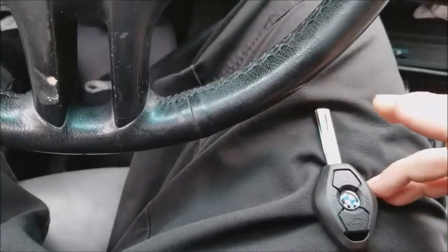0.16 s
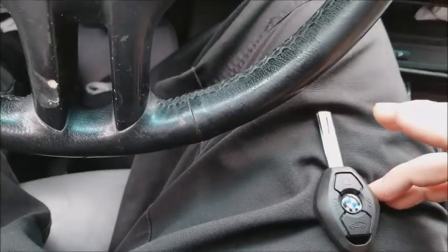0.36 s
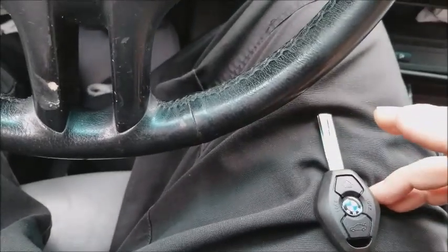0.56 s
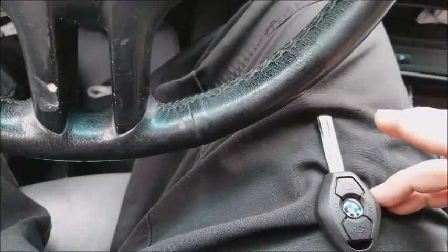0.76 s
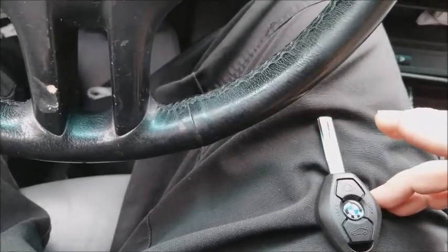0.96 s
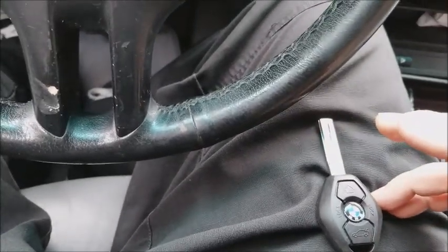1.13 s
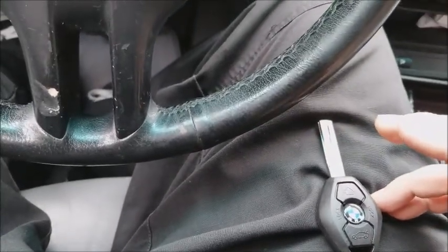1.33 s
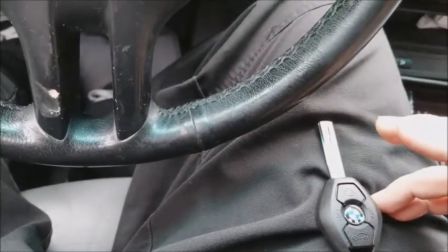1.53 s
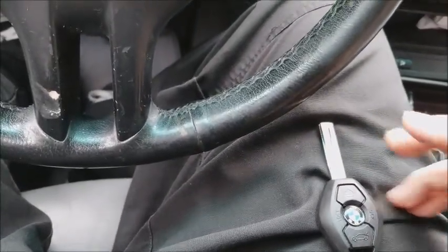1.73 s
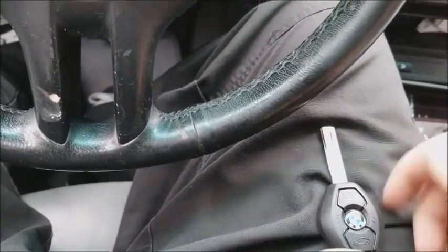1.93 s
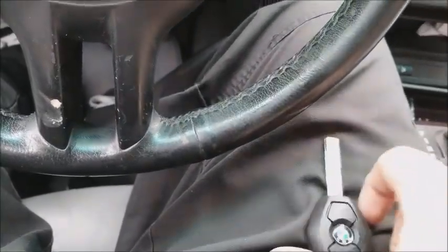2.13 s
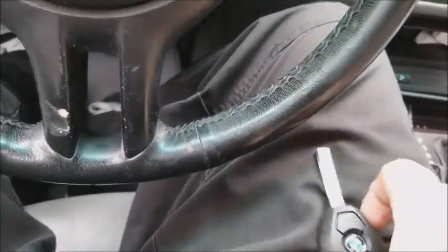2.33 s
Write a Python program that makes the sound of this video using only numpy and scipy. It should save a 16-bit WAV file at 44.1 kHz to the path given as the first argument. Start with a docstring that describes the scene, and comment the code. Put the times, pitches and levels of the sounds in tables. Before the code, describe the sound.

Car central locking cycles once inside a quiet parked car: a soft relay click, a short motor whirr, overlapping latch clunks with a low cabin thump, a smaller click, then a hand brushing trouser cloth, recorded close in stereo.

```python
"""Central locking from the driver's seat

Inside a parked car, in stereo: door motors whirr for a fifth of a second and latches strike one after another.
Each blow is shaped noise for the clack, decaying modes for metal and door skin, and a gliding tone for cabin boom.
Soft relay clicks come before and after; then a hand slides over trouser cloth, as coloured noise in strokes.
The arm shifts with a dull rumble, and a faint low rumble of steady noise lies under everything."""
import sys
import numpy as np
from scipy import signal
from scipy.fft import rfft, irfft, next_fast_len
from scipy.io import wavfile
from scipy.ndimage import map_coordinates

SR = 44100
rng = np.random.default_rng(int(sys.argv[2]) if len(sys.argv) > 2 else 0)


def int16_out(signal):
    """Quantize to a 16-bit WAV file."""
    q = np.round(np.clip(np.atleast_2d(signal).T, -1, 1) * 32767)
    wavfile.write(sys.argv[1], SR, q.astype(np.int16))


N = 109809
T = np.arange(N) / SR  # seconds
TOP_HZ = 15850  # the recorder's band limit

# Stereo places, each three lists: (pitch_hz, likeness of the two sides 0..1),
# (pitch_hz, left_minus_right_db), (pitch_hz, left_lead_rad)
DOORS_PLACE = ([(100, 1), (260, .85), (500, 0.46), (1100, 0.55), (1700, 0.13), (3300, .15), (15000, 0.066)],
               [(90, 2), (180, 5), (300, -1.5), (700, 2), (1100, 2.5), (1600, 5), (3300, 4.5), (6500, 2),
               (9000, -3), (14000, 8.5)], [(90, 0.8), (180, 0.6), (360, 0.08), (485, 0.57), (640, 2.5),
               (780, 1), (1150, 3), (1380, 3), (1580, -0.9), (1700, -2.5), (2300, -5.2), (3500, 2.46)])
LAP_PLACE = ([(400, 0.79), (1500, 0.24), (3300, 0.11), (15000, 0.046)], [(400, -6.5), (1400, 14),
             (2400, 13.5), (4400, 9.5), (8100, 1), (15000, 17.5)], [(500, -0.59), (1500, 1.1),
             (3300, -1.3)])
AROUND_PLACE = ([(100, .9), (400, 0.5), (2000, .15), (10000, 0.022)], [(100, 2.5), (700, 3), (8000, 0),
                (15000, 0.5)], [(100, 0.00077)])

# Still cabin, spectrum: pitch_hz, density_db (per Hz, relative)
CABIN_SPECTRUM = [(22, -20.5), (38, -10), (55, 6), (85, -5), (120, 0), (160, -6), (200, -8.5), (250, -19.5),
                  (390, -18), (500, -23.5), (640, -30.5), (1100, -30.5), (3000, -32.5), (8000, -35),
                  (15000, -31.5)]
CABIN_DB = -65

# Arm shifting on the seat, spectrum: pitch_hz, density_db (per Hz, relative)
SHIFT_SPECTRUM = [(40, -19), (70, -5.5), (140, 5.5), (200, -5), (280, -9), (480, -15), (700, -36)]
SHIFT_ON_S, SHIFT_OFF_S, SHIFT_RISE_S, SHIFT_T60_S, SHIFT_DB = 1.86, 2.28, 0.091, 1, -66

# Hand strokes on cloth: start_s, end_s, rise_s, fall_s (both to 1/e), scuff_db, rasp_db, hiss_db, sheen_db
STROKES = [(1.602, 1.682, 0.02, .014, -84, -70, -55.5, -50.5),
           (1.843, 1.874, 0.01, 0.017, -71.5, -72, -61, -54),
           (1.893, 1.92, 0.0095, .012, -77, -80, -60, -53.5),
           (1.944, 2.018, 0.0079, 0.028, -88, -67.5, -54.5, -54.5),
           (2.112, 2.167, 0.025, 0.024, -75, -72.5, -60.5, -60.5),
           (2.169, 2.332, 0.017, 0.035, -75.5, -58.5, -54.5, -58.5),
           (2.313, 2.413, 0.038, 0.043, -76.5, -80, -60, -53.5)]
# Cloth layers from dull to bright, spectra: pitch_hz, density_db (per Hz, relative)
SCUFF_SPECTRUM = [(100, 4.5), (250, 0.5), (470, 5), (580, -7.5), (760, 2.5), (1100, -10.5), (2000, -21.5)]
RASP_SPECTRUM = [(600, -37), (1100, -21.5), (1450, -0.5), (1900, -0.5), (2700, -4.5), (5000, -17.5)]
HISS_SPECTRUM = [(1200, -32), (2000, -27), (3000, -11), (4200, -3.5), (5200, -6), (7000, -8.5), (9000, -12),
                 (12000, -18)]
SHEEN_SPECTRUM = [(3000, -19.5), (8000, -1), (10500, -8.5), (12500, -2.5), (15500, -4)]
CLOTH_GRAIN_DB, PRESSURE_SWAY_DB = 0.63, .6  # scale of the random level curves

# Door motor whirr and gear backlash rattle, spectra: pitch_hz, density_db (per Hz, relative)
MOTOR_SPECTRUM = [(50, -5.5), (120, 9), (200, 11), (280, -1.5), (380, 6.5), (700, -2.5), (1000, -6.5),
                  (1700, -11), (2400, -13), (3200, -16.5), (4800, -22.5), (7000, -31.5), (10000, -43.5),
                  (15500, -42.5)]
RATTLE_SPECTRUM = [(600, -19.5), (1100, -0.5), (1600, 3), (2300, -5.5), (3000, -14.5), (5000, -16.5),
                   (8000, -26), (14000, -38.5)]
MOTOR_ON_S, MOTOR_RISE_S, MOTOR_OFF_S, MOTOR_OFF_T60_S = .604, .017, .795, 0.13
MOTOR_DB, MOTOR_RUN_DB = -42.5, -12.5  # overall gain; steady effort relative to the extra starting effort
MOTOR_SETTLE_S = .05  # starting effort falls to 1/e
GEAR_HZ, GEAR_DEPTH = 310, 0.12  # mean tooth rate and its level ripple
RATTLE_DB, RATTLE_T60_S = -4.5, 0.023  # level relative to the whirr
RATTLE_PER_S, RATTLE_SCATTER_DB = 230, 2.5  # contact rate before its random drift
ENGAGE_S, ENGAGE_DB = 0.67, -58.5  # fizzy tick as the gears take up
JOLT_S, JOLT_DB, JOLT_HZ = .616, -37.5, 166  # the motors' starting kick, pitch before its sag

# Impacts: start_s, clack_db, snap_db, tick_db, ring_db, thud_db, boom_db, boom_pitch_hz, door_skin_db, rise_s
RELAY_CLICKS = [(.097, -59, -64, -62.5, -61.5, -50.5, -40, 188, -51.5, 0.0043),
                (.12, -61.5, -67.5, -71, -80, -57.5, -67, 187, -54.5, .014),
                (1.099, -57.5, -64.5, -62, -58.5, -51.5, -38, 178.8, -50, 0.0076)]
LATCH_BLOWS = [(.673, -33, -38.5, -56, -32.5, -53.5, -24, 188.5, -37.5, 0.0045),
               (.741, -38.5, -54.5, -69.5, -45, -54, -53, 153, -50.5, 0.0041),
               (.745, -29.5, -28, -42, -29.5, -34, -32, 112.8, -32.5, 0.0049),
               (.756, -30, -41, -38.5, -40, -40.5, -31.5, 162.7, -44, .002),
               (.799, -35, -36, -46.5, -34, -49.5, -31.5, 194, -28.5, 0.00089),
               (0.857, -49, -67, -77, -65.5, -47, -46.5, 164, -74, 0.002),
               (1.128, -51.5, -67, -71, -79, -49.5, -61, 168, -52.5, 0.0034)]
# Faint low booms in the cabin: start_s, level_db, pitch_hz (before the sag)
KNOCKS = [(.001, -46.5, 184.5), (0.026, -46.5, 188.2), (0.938, -51.5, 185.4), (0.973, -48, 172)]
# Modes of relay, latch and door skin: pitch_hz, level_db (before scatter), t60_s
RELAY_MODES = [(2326, -9, 0.16), (2470, -4.5, 0.16), (2524, 0.5, 0.09), (2770, -12, 0.067),
               (5650, -14, 0.071), (7220, -10, 0.062)]
LATCH_MODES = [(1070, -7, .1), (1204, -6, .08), (1385, -9, .09), (1442, -9, .09), (1565, -6, .07),
               (1590, -3, .1), (1694, -2.5, .1), (2749, -13, .1), (3068, -10, .09), (3419, -10, .09),
               (3514, -6.5, .08), (4440, -12, .09), (6225, -15, .09), (7962, -15, .06)]
PANEL_MODES = [(362, 0, .175), (485, -12, .12), (549, -23, .2), (635, -13, .1), (723, -22, .09),
               (790, -21, .08), (912, -23, .1)]
# Noise parts of an impact, spectra: pitch_hz, density_db (per Hz, relative)
THUD_SPECTRUM = [(30, -23), (60, -15.5), (80, -1), (125, -7.5), (170, 6.5), (260, -7), (400, -14),
                 (900, -57)]
CLACK_SPECTRUM = [(120, -49), (260, -13), (450, 7.5), (720, 5.5), (930, -2.5), (1200, 5.5), (1650, -3),
                  (2100, -11.5), (3000, -15), (6000, -61.5)]
SNAP_SPECTRUM = [(900, -37), (1900, 1), (2500, -0.5), (3400, 1), (4000, -5), (5200, -2), (7000, -8.5),
                 (8600, -12.5), (10000, -22), (16000, -42)]
TICK_SPECTRUM = [(4000, -31), (8000, 1), (9300, 3.5), (10800, -5), (12500, 1.5), (15500, 3)]
# The car body's lingering answer to a clack, spectrum: pitch_hz, density_db (per Hz, relative)
BODY_SPECTRUM = [(150, -16), (260, -0.5), (400, 1.5), (520, 0), (750, -7), (1100, -15), (2500, -30.5),
                 (8000, -43)]
THUD_T60_S, CLACK_T60_S, SNAP_T60_S, TICK_T60_S = 0.29, 0.11, 0.099, 0.11
THUD_RISE_S, PANEL_RISE_S = 0.0046, .013
TAIL_DB, TAIL_T60_S = -31, 0.22  # the cabin's late answer
BODY_DB, BODY_RISE_S, BODY_T60_S = -23, 0.01, .5  # level relative to the clack
MODE_SCATTER_DB, MODE_LEAD_SCATTER_RAD = 2.56, 0.9  # standard deviations, drawn for each mode at each blow
BOOM_PAN_DB, BOOM_LEAD_RAD = 4, .2  # left over right
BOOM_RISE_S, BOOM_FALL_S = 0.01, 0.014  # fall: width of a Gaussian
REBOUND_S, REBOUND_WIDTH_S, REBOUND_DB = 0.056, .016, -12  # delay, Gaussian width, level
BOOM_SAG = .05  # share of pitch lost as the first push dies


def amp(db):
    """Decibels to gain."""
    return 10 ** (np.asarray(db) / 20)


def unit(x):
    """Scale to rms 1."""
    return x / np.sqrt(np.mean(x ** 2) + 1e-20)


def along(points, hz):
    """Read (pitch_hz, value) points on a log pitch axis."""
    point_hz, values = np.transpose(points)
    return np.interp(np.log(hz + 1), np.log(point_hz + 1), values)


def sides(pan_db, lead):
    """Complex left and right gains for a level and a phase difference."""
    left = amp(pan_db / 2) * np.exp(.5j * lead)
    right = amp(-pan_db / 2) * np.exp(-.5j * lead)
    return np.array([left, right])


def wobble(rate):
    """A smooth random curve, rate knots a second."""
    knots = rng.standard_normal(int(N * rate / SR) + 4)
    return map_coordinates(knots, [T * rate])


def noise(spectrum, place):
    """Coloured stereo noise of rms 1, with a place's likeness, level and phase between the sides."""
    alike, pan, lead = place
    size = next_fast_len(N, True)
    hz = np.fft.rfftfreq(size, 1 / SR)
    common, apart = rfft(rng.standard_normal((2, size))) * amp(along(spectrum, hz))
    # Opposite amounts of the second noise set how alike the sides are
    angle = np.arccos(np.clip(along(alike, hz), 0, 1)) / 2
    shared = common * np.cos(angle)
    difference = apart * np.sin(angle)
    pair = np.array([shared + difference, shared - difference])
    placed = pair * sides(along(pan, hz), along(lead, hz))
    return unit(irfft(placed, size)[:, :N])


def since(s):
    """Time since s, zero before it."""
    return np.maximum(T - s, 0)


def swell(s, rise):
    """A smooth step from 0 to 1."""
    return np.sin(np.pi / 2 * np.minimum(since(s) / rise, 1)) ** 2


def fade(s, t60):
    """Exponential decay from s on, 60 dB in t60 seconds."""
    return np.exp(-np.log(1000) * since(s) / t60)


def burst(s, rise, t60):
    """Envelope of a blow: rise, quick decay and a weak late tail."""
    tail = amp(TAIL_DB) * fade(s + rise, TAIL_T60_S)
    return swell(s, rise) * np.hypot(fade(s + rise, t60), tail)


def cabin():
    """Steady low noise around the listener in the still cabin."""
    return amp(CABIN_DB) * noise(CABIN_SPECTRUM, AROUND_PLACE)


def arm():
    """The arm shifts on the seat: dull noise swells, holds and fades."""
    level = swell(SHIFT_ON_S, SHIFT_RISE_S) * fade(SHIFT_OFF_S, SHIFT_T60_S)
    return amp(SHIFT_DB) * level * noise(SHIFT_SPECTRUM, AROUND_PLACE)


def cloth():
    """A hand rubs the weave: each stroke mixes scuff, rasp, hiss and sheen, roughened by grain and pressure."""
    out = np.zeros((2, N))
    colours = (SCUFF_SPECTRUM, RASP_SPECTRUM, HISS_SPECTRUM, SHEEN_SPECTRUM)
    for start, end, rise, fall, *levels_db in STROKES:
        level = np.exp(-np.maximum(start - T, 0) / rise - since(end) / fall)
        rub = sum(amp(db) * noise(colour, LAP_PLACE) for db, colour in zip(levels_db, colours))
        texture_db = CLOTH_GRAIN_DB * wobble(460) + PRESSURE_SWAY_DB * wobble(45)
        out += level * amp(texture_db) * rub
    return out


def boom(s, db, hz):
    """The cabin air swings up in a few cycles, drops quickly and rebounds once, slightly lower in pitch."""
    push = np.exp(-(since(s + BOOM_RISE_S) / BOOM_FALL_S) ** 2 / 2)
    rebound = amp(REBOUND_DB) * np.exp(-((since(s) - REBOUND_S) / REBOUND_WIDTH_S) ** 2 / 2)
    pitch_hz = hz * (1 - BOOM_SAG * (1 - push))
    cycles = np.cumsum(pitch_hz * (T > s)) / SR
    ears = sides(BOOM_PAN_DB, BOOM_LEAD_RAD)[:, None]
    wave = (ears * np.exp(2j * np.pi * cycles)).real
    return amp(db) * swell(s, BOOM_RISE_S) * (push + rebound) * wave


def gear_rattle():
    """Backlash in the housing: irregular contacts of uneven strength, each a short decay of noise."""
    rate = RATTLE_PER_S * np.exp(.4 * wobble(150))
    turns = np.floor(np.cumsum(rate) / SR)
    contacts = np.diff(turns, prepend=0) * amp(RATTLE_SCATTER_DB * rng.standard_normal(N))
    envelope = signal.fftconvolve(contacts, fade(0, RATTLE_T60_S))[:N]
    return unit(envelope * noise(RATTLE_SPECTRUM, DOORS_PLACE))


def motors():
    """The motors kick and whirr with gear ripple and rattle, tick as gears take up, settle quieter and stop."""
    effort = amp(MOTOR_RUN_DB) + np.exp(-since(MOTOR_ON_S + MOTOR_RISE_S) / MOTOR_SETTLE_S)
    level = swell(MOTOR_ON_S, MOTOR_RISE_S) * effort * fade(MOTOR_OFF_S, MOTOR_OFF_T60_S)
    tooth_cycles = np.cumsum(GEAR_HZ * (1 + .05 * wobble(40))) / SR
    teeth = 1 + GEAR_DEPTH * np.sin(2 * np.pi * tooth_cycles)
    running = teeth * noise(MOTOR_SPECTRUM, DOORS_PLACE) + amp(RATTLE_DB) * gear_rattle()
    engage = amp(ENGAGE_DB) * burst(ENGAGE_S, .005, 0.19) * noise(TICK_SPECTRUM, DOORS_PLACE)
    return amp(MOTOR_DB) * level * running + engage + boom(JOLT_S, JOLT_DB, JOLT_HZ)


def ring(modes, s, rise):
    """Modes struck at s decay exponentially, each with a fresh strength, phase and lead between the sides."""
    out = np.zeros((2, N))
    live = slice(int(s * SR), int(s * SR) + SR // 2)  # half a second
    t = since(s)[live]
    _, pan, lead = DOORS_PLACE
    for hz, db, t60 in modes:
        mode_lead = along(lead, hz) + rng.normal(0, MODE_LEAD_SCATTER_RAD)
        ears = sides(along(pan, hz), mode_lead)[:, None]
        decay = np.log(1000) * np.maximum(t - rise, 0) / t60
        wave = np.exp(2j * np.pi * (hz * t + rng.random()) - decay)
        strength = amp(db + MODE_SCATTER_DB * rng.standard_normal())
        out[:, live] += strength * (ears * wave).real
    return out * swell(s, rise)


def impacts(rows, modes):
    """Plastic clatters as noise bursts; the struck part, the door skin, the body and the cabin ring with it."""
    out = np.zeros((2, N))
    for s, clack_db, snap_db, tick_db, ring_db, thud_db, boom_db, boom_hz, panel_db, rise in rows:
        parts = ((clack_db, rise, CLACK_T60_S, CLACK_SPECTRUM),
                 (snap_db, rise, SNAP_T60_S, SNAP_SPECTRUM),
                 (tick_db, rise, TICK_T60_S, TICK_SPECTRUM),
                 (thud_db, THUD_RISE_S, THUD_T60_S, THUD_SPECTRUM))
        for db, part_rise, t60, spectrum in parts:
            out += amp(db) * burst(s, part_rise, t60) * noise(spectrum, DOORS_PLACE)
        out += amp(ring_db) * ring(modes, s, rise)
        out += amp(panel_db) * ring(PANEL_MODES, s, PANEL_RISE_S)
        body_level = swell(s, BODY_RISE_S) * fade(s, BODY_T60_S)
        out += amp(clack_db + BODY_DB) * body_level * noise(BODY_SPECTRUM, DOORS_PLACE)
        out += boom(s, boom_db, boom_hz)
    return out


def latches():
    """Relay clicks and latch blows excite their own modes; soft knocks only boom in the cabin."""
    relays = impacts(RELAY_CLICKS, RELAY_MODES)
    blows = impacts(LATCH_BLOWS, LATCH_MODES)
    return relays + blows + sum(boom(*knock) for knock in KNOCKS)


def scene():
    """Still cabin, arm and cloth, with the motors and latches in the doors."""
    return cabin() + arm() + cloth() + motors() + latches()


def record(dry):
    """The recorder keeps nothing at or above its band limit."""
    size = next_fast_len(N + SR // 2)
    kept = np.fft.rfftfreq(size, 1 / SR) < TOP_HZ
    return irfft(rfft(dry, size) * kept, size)[:, :N]


dry = scene()
out = record(dry)
int16_out(out)
```